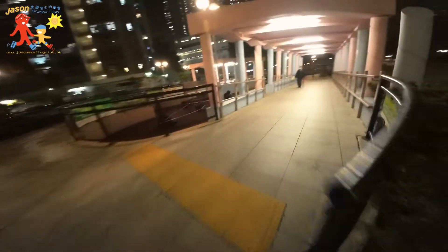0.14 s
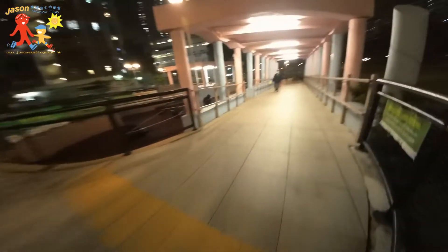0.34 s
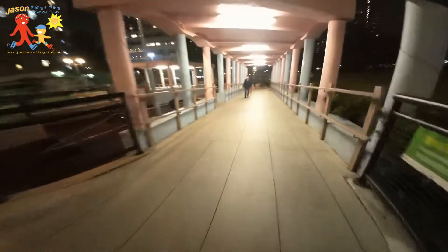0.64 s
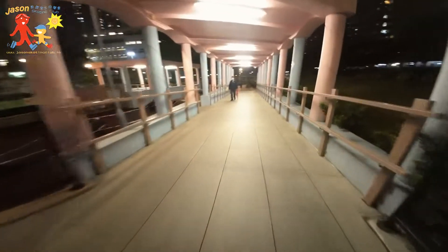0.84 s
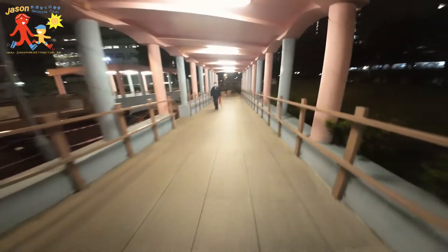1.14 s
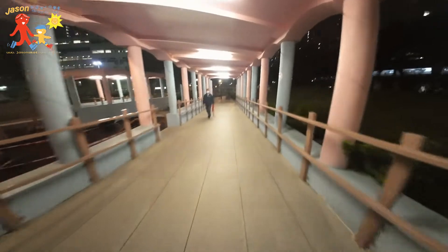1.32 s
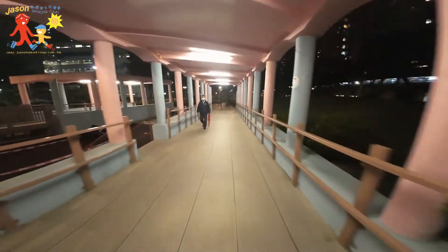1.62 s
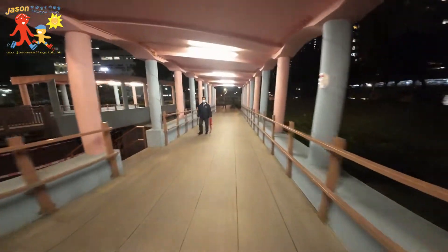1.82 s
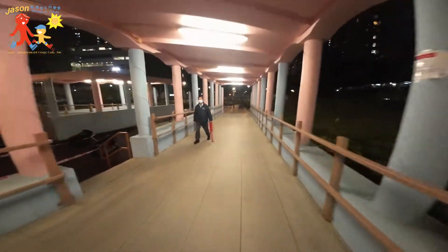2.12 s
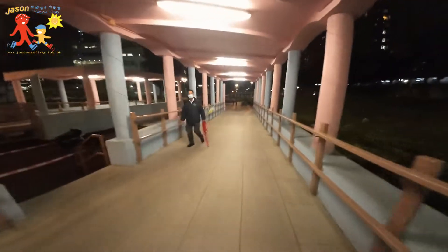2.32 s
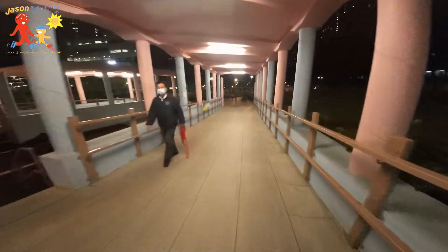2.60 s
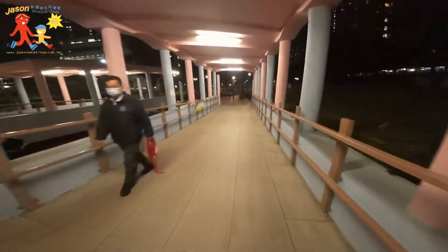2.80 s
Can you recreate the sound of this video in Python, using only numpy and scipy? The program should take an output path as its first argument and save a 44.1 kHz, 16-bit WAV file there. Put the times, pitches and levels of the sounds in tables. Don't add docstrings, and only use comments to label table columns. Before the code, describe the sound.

Skate wheels rumble steadily over concrete, rattle sharply across a bumpy strip before the first second, then scrub faintly sideways and roll on, with small ticks, rustles and low wind thumps at a microphone carried along outdoors.

```python
import sys
import numpy as np
from scipy import signal
from scipy.fft import rfft, irfft
from scipy.io import wavfile
from scipy.ndimage import uniform_filter1d

SR = 44100
rng = np.random.default_rng(int(sys.argv[2]) if len(sys.argv) > 2 else 0)


def dump_mix(stems):
    frames = np.atleast_2d(stems).T
    limited = np.clip(frames, -1, 1)
    pcm = np.round(limited * 32767).astype(np.int16)
    wavfile.write(sys.argv[1], SR, pcm)


def volts_from_decibels(level):
    exponent = np.asarray(level, float) / 20
    return 10 ** exponent


N = 130095


def noise(size=N):
    return rng.standard_normal(size)


def evened(x):
    return x / np.sqrt(np.mean(x ** 2) + 1e-20)


def along(rows, column):
    rows = np.array(rows, float)
    return np.interp(np.arange(N) / SR, rows[:, 0], rows[:, column])


def coloured(x, points):
    f, db = np.transpose(points)
    hz = np.fft.rfftfreq(len(x), 1 / SR)
    gain = volts_from_decibels(np.interp(np.log(hz + 1), np.log(f + 1), db))
    return irfft(rfft(x) * gain, len(x))


def resonate(x, hz, width):
    turn = np.exp(2j * np.pi * np.cumsum(hz * np.ones(len(x))) / SR)
    r = np.exp(-np.pi * abs(width) / SR)
    smooth = signal.lfilter([1 - r], [1, -r], x / turn)
    return 2 * (turn * smooth).real


def resonate_twice(x, hz, width):
    return resonate(resonate(x, hz, width), hz, 2 * width)


def rings(x, table):
    return evened(sum(volts_from_decibels(db) * evened(resonate_twice(x, hz, w)) for hz, w, db in table))


def drift(seconds):
    span = max(int(seconds * SR), 2)
    return evened(uniform_filter1d(uniform_filter1d(noise(), span), span))


def add(mix, s, sound):
    part = mix[round(s * SR):][:len(sound)]
    part += sound[:len(part)]


def bursts(rows):
    gate = np.zeros(N)
    for s, length, db in rows:
        add(gate, s, volts_from_decibels(db) * np.hanning(int(length * SR)) ** .5)
    return gate


# time in seconds, three times the turn rate in Hz, level in dB.
WHEEL_SPIN = [(0, 132.3, -42.5), (.2, 131.6, -46.5), (.42, 133.6, -54), (.52, 135.2, -42.5),
              (.8, 132.9, -33), (.9, 133.9, -41), (1.22, 129, -35.5), (1.45, 127.2, -39),
              (1.58, 124.8, -53.5), (1.72, 125.9, -39), (2.0, 128.7, -41), (2.3, 133, -39.5),
              (2.5, 133, -35), (2.62, 132.4, -37), (2.7, 136.8, -40.5), (2.95, 144.3, -42.5)]
# multiple, level in dB.
TURN_MULTIPLES = [(1, -5), (2, -5.5), (3, -1.5), (4, -32)]


def hum():
    wobble_width_hz = 17
    turn = along(WHEEL_SPIN, 1) / 3
    out = 0
    for k, db in TURN_MULTIPLES:
        wobble = evened(resonate(noise(), k * turn, wobble_width_hz))
        line = np.sqrt(2) * np.sin(2 * np.pi * np.cumsum(k * turn) / SR)
        out = out + volts_from_decibels(db) * (line + .25 * wobble)
    return volts_from_decibels(along(WHEEL_SPIN, 2) + 2.6 * drift(.05)) * out


# time in seconds, level in dB.
LOAD = [(0, -41), (.3, -40.5), (.58, -39), (.95, -41), (1.3, -40.5), (1.6, -41), (2.0, -40.5), (2.5, -40.5),
        (2.7, -41), (2.95, -40)]
# frequency in Hz, level in dB.
ROAD_TONE = [(88, -66), (150, -1), (230, -6.5), (751, -9), (1480, -15.5), (1910, -20), (4650, -32),
             (10100, -37.5), (15500, -95)]
# frequency in Hz, width in Hz, level over the road in dB.
FRAME = [(607, 1100, -3), (880, 67, -10.5), (2020, 450, 3), (3500, 1100, -7.5)]
# time in seconds, level in dB.
FRAME_DRIVE = [(0, -5), (.3, -1.5), (.5, -5.5), (1.0, 6), (1.5, -0.5), (1.9, 1.5), (2.45, 2.5), (2.6, 1),
               (2.85, 4), (2.95, 5)]


def road():
    grit_per_s, grit_spread_db, grit_share = 2500, 5.5, 0.36
    size = volts_from_decibels(grit_spread_db * np.minimum(rng.exponential(1, N), 4))
    hit = rng.random(N) < grit_per_s / SR
    grit = size * hit * rng.choice([-1, 1], N)
    drive = (grit_share * evened(grit) + noise()) * volts_from_decibels(.5 * drift(.015))
    ring = [1, 1] + [volts_from_decibels(along(FRAME_DRIVE, 1) + 1.6 * drift(0.024)) for _ in FRAME[2:]]
    drive = drive + sum(g * volts_from_decibels(db) * resonate(drive, hz, w) for g, (hz, w, db) in zip(ring, FRAME))
    x = coloured(drive, [(60, -43)] + list(ROAD_TONE))
    return volts_from_decibels(along(LOAD, 1) + 1.5) * evened(x)


# time in seconds, studs per second in Hz, level in dB.
STUDS = [
    (.80, 48, -40),
    (.82, 51, -26),
    (.85, 59, -26),
    (.88, 62, -24),
    (.918, 70, -18.5),
    (.935, 66, -27),
    (.947, 64, -45),
]


def studs():
    peak_s, second_db, third_db = .918, -18, -17
    a = 2 * np.pi * np.cumsum(along(STUDS, 1)) / SR
    a = a - a[round(peak_s * SR)]
    wave = np.cos(a) + volts_from_decibels(second_db) * np.cos(2 * a) + volts_from_decibels(third_db) * np.cos(3 * a)
    on = (np.arange(N) > STUDS[0][0] * SR) & (np.arange(N) < STUDS[-1][0] * SR)
    return np.sqrt(2) * volts_from_decibels(along(STUDS, 2)) * wave * on


# start in seconds, peak in dB, length in seconds, brightness in dB.
KNOCKS = [(0.6035, -20.5, 0.016, -1), (0.613, -38.5, 0.033, 7.5), (0.6294, -44, 0.013, -9),
          (0.667, -36, 0.019, 6.5), (0.6782, -31.5, 0.06, 3.5), (0.697, -24, 0.011, -1),
          (0.717, -39, 0.016, 6), (0.7274, -29.5, 0.023, 0), (0.7403, -40.5, 0.013, 16),
          (0.7494, -28.5, 0.05, -3.5), (0.7759, -22.5, 0.003, 8), (0.7785, -22.5, 0.022, 2),
          (0.784, -26, 0.009, -17), (0.8025, -25.5, 0.015, -23), (0.8537, -29, 0.024, -4.5),
          (0.867, -29.5, 0.014, 2), (0.8876, -29, 0.019, 2.5), (0.9014, -25, 0.019, -11),
          (0.9184, -24, 0.0026, 11), (0.9244, -43, 0.0062, 16), (0.9418, -44, 0.027, 11)]
# frequency in Hz, level in dB.
KNOCK_TONE = [(120, -13), (325, -6.5), (700, -10.5), (1300, -22), (2100, -10), (3100, -17), (10300, -37.5),
              (15500, -37)]
# frequency in Hz, width in Hz, level in dB.
KNOCK_RINGS = [(530, 150, 0), (800, 250, 1), (1950, 500, -6), (3560, 500, -5), (6200, 800, -5)]


def knocks():
    bounces_per_s, split_hz = 900, 3000
    dull, bright = np.zeros(N), np.zeros(N)
    t = np.arange(3000) / SR
    for s, db, length, brightness_db in KNOCKS:
        bounce = rng.random(3000) < bounces_per_s / SR
        fade = np.minimum(t / 0.003, 1) * np.exp(-t / max(length, .001))
        blow = noise(3000) * (0.51 + 0.94 * bounce) * fade
        add(dull, s, volts_from_decibels(db) * blow)
        add(bright, s, volts_from_decibels(db + brightness_db) * blow)
    low = signal.sosfilt(signal.butter(2, split_hz, fs=SR, output="sos"), dull)
    high = signal.sosfilt(signal.butter(2, split_hz, "high", fs=SR, output="sos"), bright)
    drive = low + high
    drive = drive + sum(volts_from_decibels(db) * resonate(drive, hz, w) for hz, w, db in KNOCK_RINGS)
    return volts_from_decibels(20) * coloured(drive, KNOCK_TONE)


# start in seconds, peak in dB, strongest pitch in Hz.
STRIKES = [(.1050, -32, 2800), (.1487, -31.5, 2800), (.199, -51, 3300), (.2375, -54, 3500),
           (.260, -40, 3500), (.274, -36.5, 3500), (.2975, -32.5, 3000), (.6040, -18.5, 890),
           (.6048, -28.5, 5100), (.610, -28, 3970), (.611, -43, 9000), (.617, -37, 8600), (.630, -31, 1989),
           (.632, -38, 6300), (.6655, -35, 6500), (.691, -34, 5000), (.702, -30, 2500), (.714, -26, 2000),
           (.732, -29, 6520), (.743, -44, 4000), (.750, -36, 4000), (.7735, -30.5, 3500), (.780, -28, 8000),
           (.7805, -23, 2000), (.786, -23.5, 3630), (.791, -38, 9000), (.796, -44, 6000), (.806, -28, 2200),
           (.810, -40, 5000), (.818, -34, 4000), (.8740, -29, 4800), (.8895, -39, 6000), (.902, -30, 2500),
           (.906, -22, 2500), (.919, -30, 5460), (.9235, -25.5, 4770), (.936, -35, 5000),
           (1.906, -40, 3400), (1.9225, -29, 2820), (.6845, -36, 4000), (.696, -30, 7000),
           (.722, -36, 6000), (.884, -32, 2500), (.912, -31, 3000)]
# frequency in Hz, time to fade by 60 dB in seconds.
STRIKE_MODES = [(750, 0.032), (1300, 0.011), (2050, 0.018), (3500, 0.0083), (5500, 0.0037), (6700, 0.0037),
                (8600, 0.0037), (10400, 0.0045), (13000, 0.0031)]


def strikes():
    level_db, db_per_octave, detune, crack_db = -4, 8, .04, -11
    out, t = np.zeros(N), np.arange(1200) / SR
    for s, db, colour_hz in STRIKES:
        ring = 0
        for hz, t60 in STRIKE_MODES:
            distance_db = db_per_octave * abs(np.log2(hz / colour_hz))
            note_hz = hz * (1 + detune * rng.standard_normal())
            ring = ring + volts_from_decibels(-distance_db - 60 * t / t60) * np.sin(2 * np.pi * note_hz * t)
        crack = 3 * resonate(noise(len(t)), colour_hz, 0.61 * colour_hz)
        crack = crack * volts_from_decibels(crack_db - 60 * t / 0.017)
        add(out, s, volts_from_decibels(level_db + db) * (ring + crack) * np.minimum(t / .0003, 1))
    return out


# middle in seconds, peak in dB, length in seconds.
JOLTS = [
    (.6095, -23, .007),
    (.632, -28, .008),
    (.652, -27, .010),
    (.674, -23, .010),
    (.702, -18, .007),
    (.7185, -24, .008),
    (.7395, -19, .011),
    (.761, -20, .010),
    (.787, -21, .012),
    (.805, -25, .009),
]


def jolts():
    t, out = np.arange(N) / SR, np.zeros(N)
    for s, db, length in JOLTS:
        u = (t - s) / (0.29 * length)
        out += volts_from_decibels(db) * (1 - u ** 2) * np.exp(-u ** 2 / 2)
    return out


# time in seconds, level in dB.
SCRUB = [
    (.6, -120),
    (.76, -67),
    (.82, -54.5),
    (1.0, -53.5),
    (1.3, -56),
    (1.55, -60),
    (1.72, -82),
    (2.0, -120),
]
# frequency in Hz, level in dB.
SCRUB_TONE = [(2500, -30), (6000, -16), (9300, -15), (9850, 0), (10500, -4), (11500, -10), (13300, -9),
              (15500, -15)]


def scrub():
    z = noise() * volts_from_decibels(1.3 * drift(0.013))
    return volts_from_decibels(along(SCRUB, 1)) * evened(coloured(z, SCRUB_TONE))


# start in seconds, peak in dB, pitch in Hz.
TICKS = [(.028, -51, 12000), (0.924, -49, 5500), (.121, -50, 10500), (0.112, -57, 5700), (.149, -44, 7000),
         (0.152, -49, 8600), (0.873, -48, 5400), (.889, -50, 6000), (.26, -53, 3500), (.262, -53, 10200),
         (0.273, -53, 3700), (.289, -54, 9900), (.298, -50, 6800), (0.306, -46.5, 6100), (.406, -58, 12100),
         (0.728, -43, 12700), (1.887, -46.5, 10130), (1.923, -57, 9800), (2.016, -45, 10500),
         (2.073, -41.5, 9900), (2.087, -51, 10400), (2.119, -45, 7013), (2.203, -50, 10800),
         (2.24, -44, 10700), (2.30, -48, 10040), (2.470, -45, 6000), (2.63, -48.5, 9450),
         (2.642, -51, 6500), (2.669, -44, 11990), (0.934, -39, 4500)]


def ticks():
    level_db, width_hz, wide_db, t60_s, snap = -7, 2200, -6, .035, 5.0
    band = signal.butter(2, [2500, 12000], "band", fs=SR, output="sos")
    out, t = np.zeros(N), np.arange(3000) / SR
    for s, db, hz in TICKS:
        z = (noise(3000) + snap * (t == 0)) * volts_from_decibels(-60 * t / t60_s)
        ring = 2.5 * resonate_twice(z, hz, width_hz)
        wide = volts_from_decibels(wide_db) * signal.sosfilt(band, z)
        add(out, s, volts_from_decibels(level_db + db) * (ring + wide))
    return out


# start in seconds, length in seconds, level in dB.
SQUEAKS = [
    (.115, .06, -76),
    (.305, .025, -68),
    (2.105, .055, -65),
    (2.25, .03, -78),
    (2.44, .025, -72),
    (2.47, .05, -78),
    (2.635, .09, -75),
    (2.775, .05, -74),
]


def squeaks():
    return bursts(SQUEAKS) * rings(noise(), [(15000, 250, 0)]) * volts_from_decibels(6.0)


# start in seconds, length in seconds, level in dB.
RUSTLES = [
    (.10, 0.049, -73),
    (.255, 0.058, -75),
    (.68, 0.21, -51),
    (1.2, 0.066, -55),
    (1.88, .09, -54.5),
    (2.07, 0.085, -55),
    (2.24, 0.15, -56),
    (2.385, 0.14, -52.5),
    (2.62, 0.08, -56.5),
    (2.88, 0.074, -56.5),
]
# frequency in Hz, width in Hz, level in dB.
RUSTLE_RINGS = [(9800, 800, 11), (10500, 1800, 10), (6000, 11000, 20)]


def rustles():
    scratches = noise() * volts_from_decibels(2.6 * drift(.004) + .8 * drift(.015))
    return bursts(RUSTLES) * rings(scratches, RUSTLE_RINGS)


def roof(x):
    fade_s = 0.45
    t = np.arange(SR // 2) / SR
    echoes = noise(len(t)) * (rng.random(len(t)) < .05)
    echoes = echoes * volts_from_decibels(-60 * t / fade_s) * (t > .006)
    return signal.fftconvolve(x, echoes / np.linalg.norm(echoes))[:N]


# time in seconds, level in dB.
GUST = [(.0, -36.5), (.14, -32.5), (.2, -38.5), (.3, -32.5), (.45, -36), (.78, -29), (.88, -17.5),
        (1.0, -32.5), (1.45, -39), (1.57, -32), (1.78, -34.5), (1.87, -35), (1.95, -34), (2.13, -29.5),
        (2.26, -31.5), (2.33, -39), (2.64, -32.5), (2.95, -37)]
# frequency in Hz, level in dB.
WIND_TONE = [(11, -48), (18, 2.5), (60, -2.5), (126, -11.5), (226, -24), (300, -25), (390, -67),
             (660, -120)]
# time in seconds, change in dB.
WIND_DIP = [
    (.57, 0),
    (.62, -7),
    (.93, -11),
    (.97, 0),
]


def wind():
    x = coloured(noise(), [(16, -17.5)] + list(WIND_TONE) + [(900, -54)])
    level_db = along(GUST, 1) + along(WIND_DIP, 1) + 1.5 + 1.7 * drift(0.041)
    return volts_from_decibels(level_db) * evened(x)


# frequency in Hz, level in dB.
AIR_TONE = [(3000, -20), (6000, -13), (12000, 14), (15500, 18)]


def air():
    return volts_from_decibels(-71) * evened(coloured(noise(), AIR_TONE))


def scene():
    hits = knocks() + strikes() + ticks()
    echoes = volts_from_decibels(-8) * roof(hits)
    wheels = hum() + road() + studs() + jolts() + scrub()
    small = squeaks() + rustles()
    return (wheels + hits + echoes + small + wind() + air())[None]


# frequency in Hz, level in dB.
MIC = [(12500, -1), (14300, -6), (15200, -7), (15500, -21), (15800, -44)]


def microphone(dry):
    return coloured(dry[0], MIC)[None]


def top_cut(x):
    return signal.sosfilt(signal.butter(12, 15700, fs=SR, output="sos"), x)


def record(dry):
    mix = microphone(dry)
    return top_cut(mix)


dry = scene()
out = record(dry)
dump_mix(out)
```